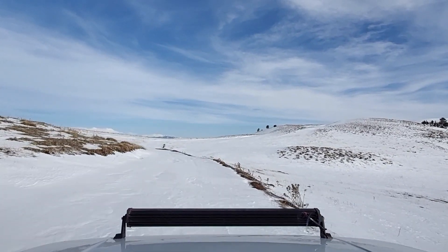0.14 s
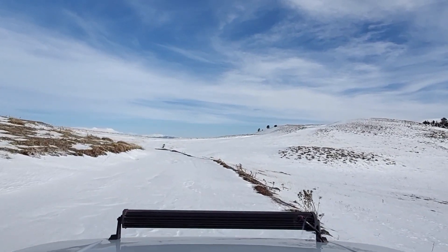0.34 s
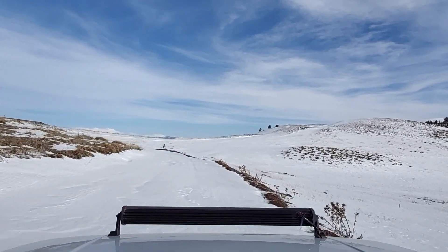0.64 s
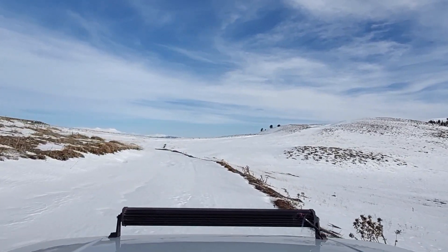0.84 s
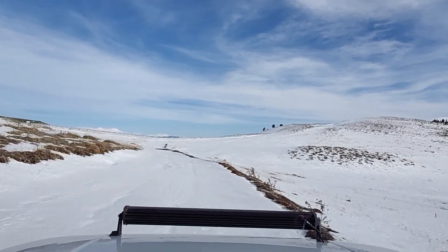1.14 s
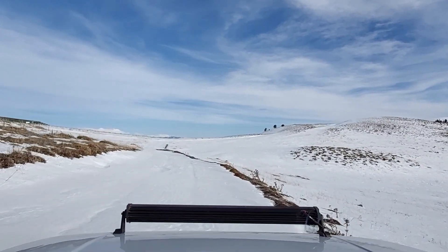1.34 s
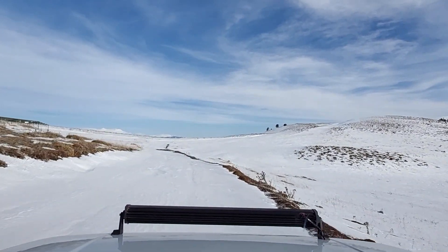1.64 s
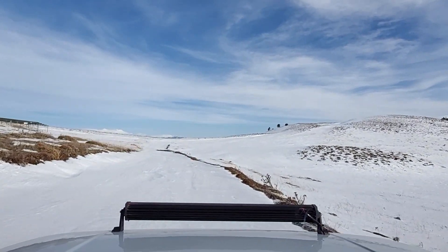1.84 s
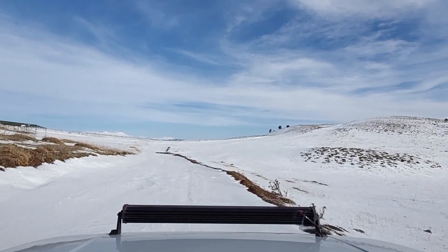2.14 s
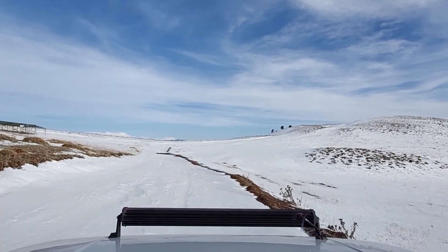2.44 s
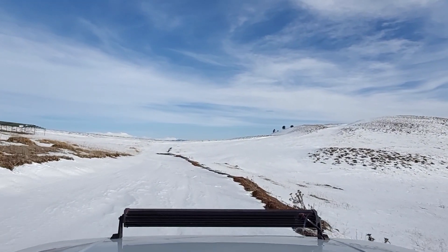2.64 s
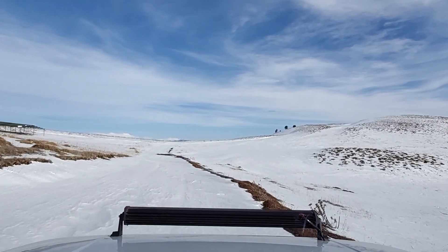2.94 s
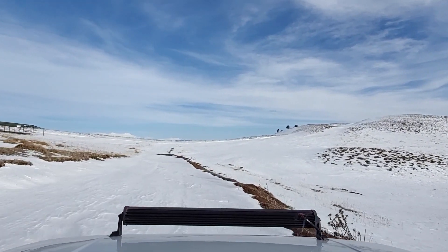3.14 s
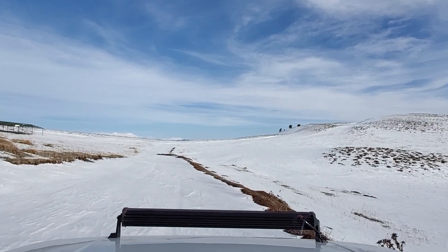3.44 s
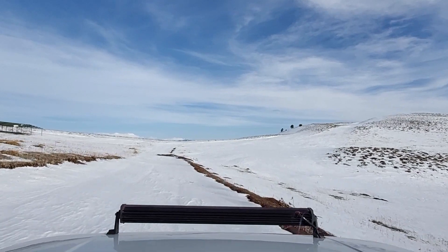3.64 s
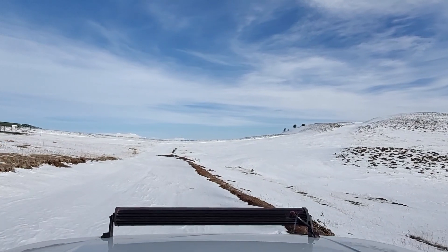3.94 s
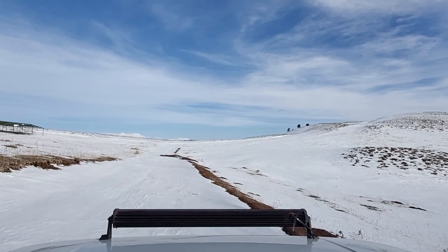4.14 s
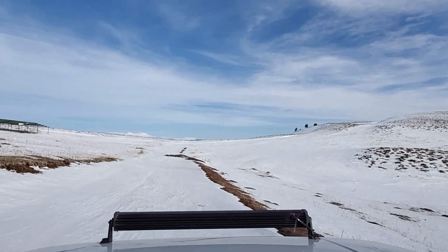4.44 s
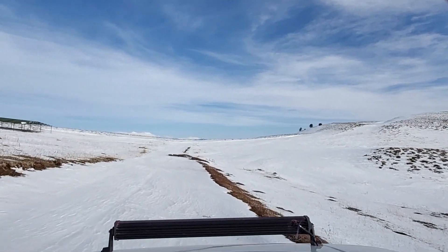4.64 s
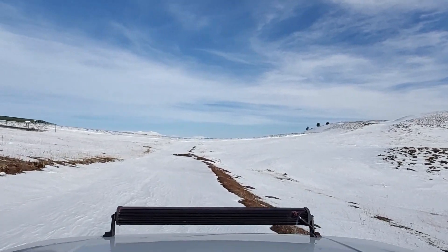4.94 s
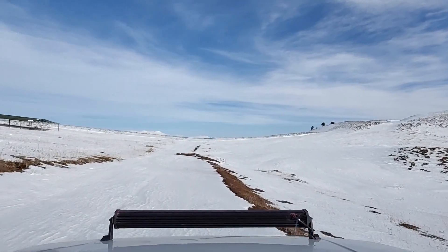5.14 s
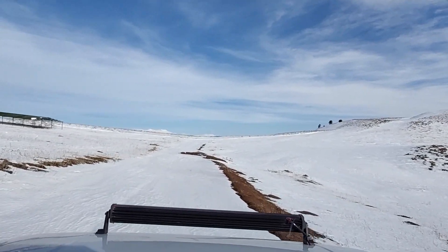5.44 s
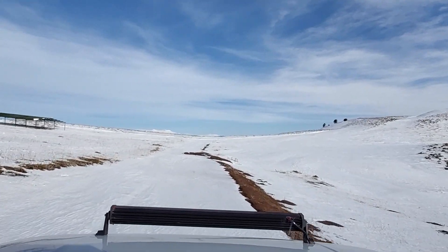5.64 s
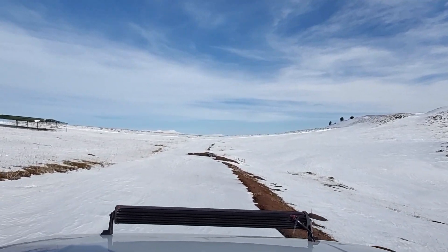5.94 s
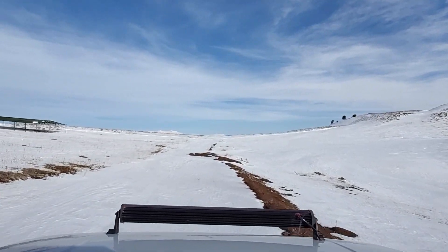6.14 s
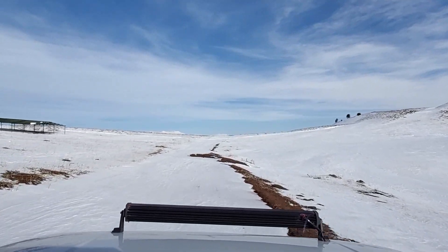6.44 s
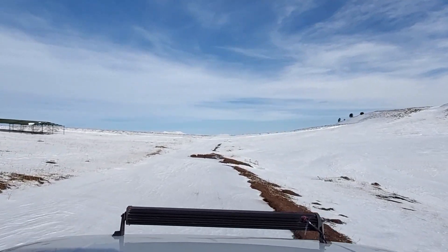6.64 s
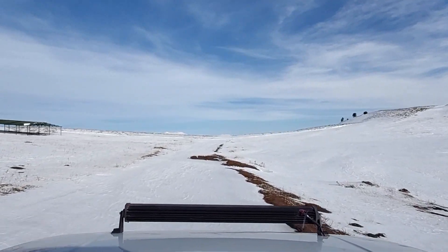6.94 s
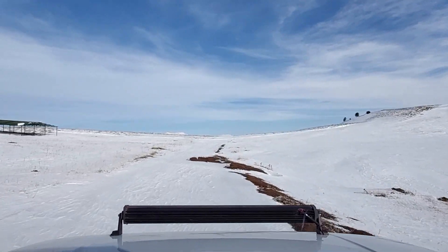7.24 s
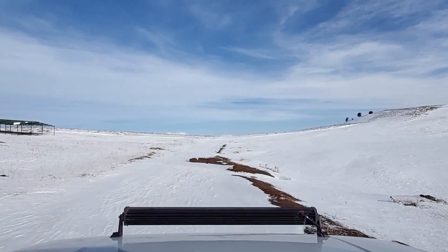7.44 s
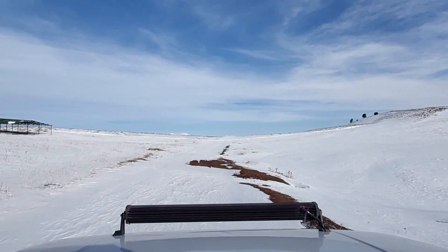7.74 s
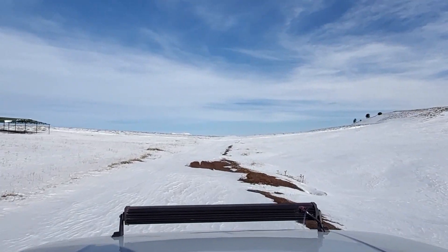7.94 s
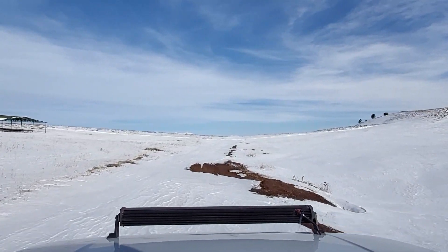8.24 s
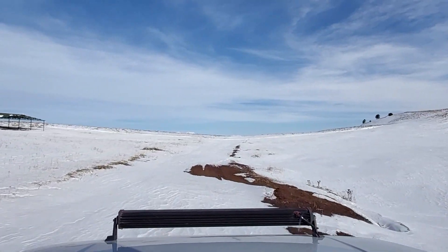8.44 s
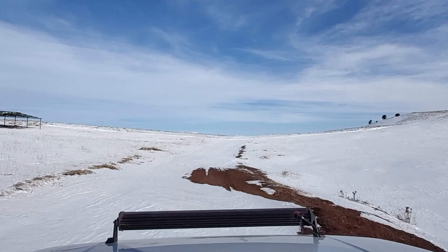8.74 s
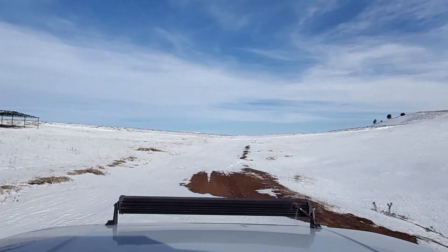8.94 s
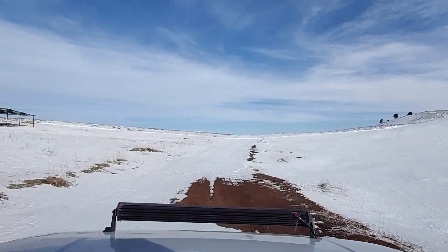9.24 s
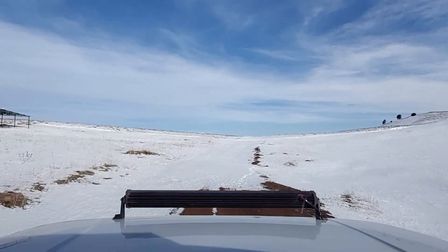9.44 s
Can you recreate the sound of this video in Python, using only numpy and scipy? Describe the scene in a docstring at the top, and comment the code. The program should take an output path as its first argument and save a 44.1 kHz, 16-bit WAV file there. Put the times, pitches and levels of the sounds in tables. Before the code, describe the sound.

An off-road car's engine booms at high revs inside the cabin, drops at an upshift, then pulls again with gear whine and ticking.

```python
"""A four-cylinder off-road car pulls over snow, heard from the cabin. First it revs high in a low gear:
the cabin booms at twice the firing rate, the engine clatters and small metal parts jingle, while the
tyres rumble through the body and hiss in the snow. From 4.3 s the car shifts up and the revs fall.
After about 5.2 s it pulls again: the higher gear whines, and a loose part ticks as the shaft turns."""
import sys
import numpy as np
from scipy.fft import rfft, irfft, next_fast_len
from scipy.io import wavfile
from scipy.ndimage import uniform_filter1d, map_coordinates

SR = 44100
rng = np.random.default_rng(int(sys.argv[2]) if len(sys.argv) > 2 else 0)


def unload_audio(sound):
    """Save the sound as a 16-bit wav file, at the path given as the first command line argument."""
    columns = np.transpose(np.atleast_2d(sound))
    # keep every value between -1 and 1, then stretch to whole-number steps
    steps = np.round(np.clip(columns, -1, 1) * 32767)
    wavfile.write(sys.argv[1], SR, steps.astype(np.int16))


N = 422478
TIME = np.arange(N) / SR
SHIFT_S = (4.3, 5.15)  # start and end of the gear shift
GEAR_RATIOS = (1.03, 1.838)  # drive shaft turns per engine cycle, before and after the shift


def amp(db):
    """Turn decibels into a gain."""
    return 10 ** (np.asarray(db) / 20)


def unit(x):
    """Scale to an average (rms) level of 1."""
    return x / np.sqrt(np.mean(x ** 2) + 1e-20)


def along(points, hz):
    """Look up a (frequency, value) table on a log frequency axis."""
    freqs, values = np.transpose(points)
    return np.interp(np.log(hz + 1), np.log(freqs + 1), values)


def curve(rows):
    """Join (time, value) points with straight lines."""
    return np.interp(TIME, *np.transpose(rows))


def swells(rows):
    """Add up bell-shaped rises and dips, in dB."""
    return sum(db * np.exp(-((TIME - s) / width) ** 2) for s, width, db in rows)


def wobble(rate):
    """A smooth curve through `rate` random points a second."""
    steps = np.arange(0, N, 64)
    points = rng.standard_normal(int(N * rate / SR) + 4)
    return np.interp(np.arange(N), steps, map_coordinates(points, [steps * rate / SR]))


def noise():
    """Two unrelated white noises."""
    return rng.standard_normal((2, N))


def filtered(x, response):
    """Give each frequency the gain response(hz); the ends are mirrored to avoid clicks."""
    size, margin = x.shape[-1], 4096
    padded = np.pad(x, [(0, 0), (margin, margin)], mode="reflect")
    length = next_fast_len(size + 2 * margin)
    spectrum = rfft(padded, length) * response(np.fft.rfftfreq(length, 1 / SR))
    return irfft(spectrum, length)[:, margin:margin + size]


# how alike the two ears hear the cabin: (frequency [Hz], likeness [0 to 1])
EAR_LIKENESS = [(100, 1), (250, 0.77), (400, 0.94), (600, 0), (1000, 0.41), (2000, 0.4), (4000, 0.026),
                (10000, 0)]

def spread(hz):
    """Stereo width as an angle: bass is alike in both ears, treble is not."""
    return np.arccos(np.clip(along(EAR_LIKENESS, hz), -1, 1)) / 2


def coloured(pair, colour):
    """Shape two noises into stereo sound of level 1; a colour says how strong each frequency is."""
    response = lambda hz: amp(along(colour, hz)) * [np.cos(spread(hz)), np.sin(spread(hz))]
    mid, side = filtered(pair, response)
    return unit(np.array([mid + side, mid - side]))


def tone(turns, hz, flutter_db, drift):
    """One wave per turn, wavering in level and phase (drift, in radians); hz sets the stereo width."""
    phase = 2 * np.pi * (turns % 1) + drift * wobble(9)
    apart = spread(hz) * rng.choice([-1, 1]) * np.array([[1], [-1]])
    return np.sqrt(2) * amp(flutter_db * wobble(14)) * np.sin((phase + apart).astype(np.float32))


# how hard the tyres crush the snow: (time [s], relative level [dB])
SNOW_CRUSH = [(0, -56.5), (1.3, -54.5), (3.1, -53), (4.25, -53), (4.45, -56.5), (4.8, -59.5), (5.4, -58.5),
              (5.9, -58.5), (6.5, -55), (7.5, -59), (8.1, -60.5), (9.58, -61)]
# rough ground under the tyres: (time [s], half width [s], extra rumble [dB])
GROUND_BUMPS = [(.6, 0.12, 3.5), (1.71, .06, 7), (2.15, .15, 4.5), (2.7, .3, 2), (3.09, .12, 7),
                (3.47, .12, 8.5), (5.17, 0.06, 3), (6.0, .13, 5.5), (6.52, 0.19, 7), (7.07, .1, 5)]
# colours of the tyre rumble, body drone and snow hiss: (frequency [Hz], level [dB])
RUMBLE_COLOUR = [(12, -39), (30, -19), (42, -10.5), (52, -6.5), (63, 0), (80, -9), (105, -6.5), (150, -5),
                 (200, -36), (400, -87)]
DRONE_COLOUR = [(100, -41.5), (160, 0), (200, -2.5), (240, 3), (290, -0.5), (350, 2.5), (410, 0),
                (460, -7.5), (510, -5.5), (580, -13.5), (800, -21), (1500, -68)]
HISS_COLOUR = [(1000, -28.5), (2700, 0.5), (3400, -3.5), (4300, 1.5), (4800, -4.5), (6000, -3.5),
               (7300, -8), (8400, -12.5), (11000, -13), (13000, -13.5), (15700, -17)]

def tyres():
    """Bumps shake the body; the harder the snow is crushed, the louder the hiss and the body's drone."""
    crush_db = curve(SNOW_CRUSH)
    rumble = amp(-32 + swells(GROUND_BUMPS)) * coloured(noise(), RUMBLE_COLOUR)
    drone = amp(crush_db + 23) * coloured(noise(), DRONE_COLOUR)
    grains = noise() * amp(1.2 * wobble(250) + 0.93 * wobble(25))
    hiss = amp(crush_db + 4) * coloured(grains, HISS_COLOUR)
    return rumble + drone + hiss


def shaft_knocks(shaft, start, end, db, scatter_db):
    """List (time, level) knocks: one at the start, then one after each turn of the shaft."""
    first, last = np.interp([start, end], TIME, shaft)
    times = np.interp(np.arange(first, last), shaft, TIME)
    return list(zip(times, db + scatter_db * rng.standard_normal(128)))


def strikes(rows, colour, ring_s, bounce_s):
    """Each hit is a sharp snap and a short ring, followed by a weaker bounce."""
    t = np.arange(SR // 8) / SR
    shape = amp(-60 * t / ring_s) + amp(1.5 - 60 * t / .008)  # ring + snap
    envelope = np.zeros(N + SR)
    for (s, db), flight in zip(rows, rng.uniform(0.34, 2, size=256)):
        bounce = s + bounce_s * flight
        envelope[round(s * SR):][:len(t)] += amp(db) * shape
        envelope[round(bounce * SR):][:len(t)] += amp(db - 8) * shape
    return envelope[:N] * coloured(noise(), colour)


# spells when a loose part knocks once per shaft turn: (start [s], end [s], relative level [dB])
RATTLE_SPELLS = [(4.589, 4.6, -45), (4.974, 5.12, -37.5), (5.549, 5.66, -34.5), (5.721, 5.82, -39),
                 (5.848, 5.99, -35.5), (6.01, 6.35, -37.5), (6.373, 6.5, -35.5), (6.523, 6.58, -33.5),
                 (6.601, 6.73, -35), (6.76, 7.3, -39.5), (7.323, 7.34, -35.5), (7.354, 7.54, -41),
                 (7.565, 7.68, -36), (7.695, 7.85, -39), (9.151, 9.17, -39), (9.465, 9.48, -43)]
# louder jingles of small metal parts, and a dull clunk in the shift: (time [s], relative level [dB])
LOUD_JINGLES = [(0.514, -44), (1.252, -46), (2.142, -47), (2.241, -44.5), (2.633, -45), (3.313, -42),
                (4.548, -46.5), (5.214, -42.5), (5.315, -47), (5.550, -44), (5.658, -47), (9.242, -51)]
SHIFT_CLUNK = [(4.69, -35.5)]
# colours of a tick, a jingle and the clunk: (frequency [Hz], level [dB])
TICK_COLOUR = [(800, -21.5), (1900, 6), (2550, 0.5), (3150, 2), (4300, -3), (5800, -2.5), (7300, -11),
               (9000, -20.5), (12000, -24), (16000, -23)]
JINGLE_COLOUR = [(2500, -43), (5000, 1), (8500, -6.5), (11200, -4.5), (13200, -1.5), (15700, -8.5)]
CLUNK_COLOUR = [(250, -24.5), (480, -2), (620, 0), (760, -12), (1500, -28), (4000, -50)]

def loose_parts(shaft):
    """Parts tick, jingle and clunk; in the low gear every shaft turn stirs a faint jingle."""
    knocks = [row for spell in RATTLE_SPELLS for row in shaft_knocks(shaft, *spell, scatter_db=1)]
    faint = shaft_knocks(shaft, 0, SHIFT_S[0], db=-54, scatter_db=4.5)
    ticks = strikes(knocks, TICK_COLOUR, ring_s=.035, bounce_s=.004)
    jingles = strikes(LOUD_JINGLES + faint, JINGLE_COLOUR, ring_s=.066, bounce_s=.006)
    clunk = strikes(SHIFT_CLUNK, CLUNK_COLOUR, ring_s=.08, bounce_s=.005)
    return amp(-7) * ticks + amp(-4.5) * jingles + clunk


# whine of the main gear pair and of the other pairs: (time [s], relative level [dB])
MAIN_WHINE = [(5.1, -80), (5.3, -47.5), (6.2, -53), (7.1, -49.5), (7.27, -39.5), (7.7, -45), (9.55, -47)]
OTHER_WHINE = [(5.1, -80), (5.8, -64), (7.1, -63), (7.7, -49), (9.58, -57)]

def gear_whine(shaft):
    """Gear teeth meet a whole number of times per shaft turn; slack makes their tones waver together."""
    turns = shaft + .009 * wobble(8)
    main = tone(28 * turns, 930, flutter_db=1.25, drift=.4)
    low = amp(1) * tone(23 * turns, 700, flutter_db=1, drift=.33)
    mid = amp(-7) * tone(35 * turns, 1100, flutter_db=1, drift=.4)
    high = amp(-6.5) * tone(41 * turns, 1300, flutter_db=1.5, drift=.8)
    return amp(curve(MAIN_WHINE)) * main + amp(curve(OTHER_WHINE)) * (low + mid + high)


def crank_pattern(cycle):
    """A rough pattern that repeats with each crank turn (two per engine cycle) and slowly changes."""
    patterns = irfft(np.exp(2j * np.pi * rng.random((4, 513))))
    place = (2 * cycle % 1) * patterns.shape[1]
    waves = np.array([np.interp(place, np.arange(len(p)), p) for p in patterns])
    blend = 1.2 * wobble(5)
    return unit(np.cos(blend) * waves[:2] + np.sin(blend) * waves[2:])


# where the body panels ring: (frequency [Hz], width [Hz], relative level [dB])
PANEL_RINGS = [(502, 48, 2.5), (713, 38, 2.5), (910, 90, -1), (1282, 24, 1), (1876, 210, -9),
               (2843, 28, -7.5)]

def panel_response(hz):
    """The body panels answer most strongly near their own ringing frequencies."""
    return sum((-1) ** k * amp(db) * 1j * hz * width / (centre ** 2 - hz ** 2 + 1j * hz * width)
               for k, (centre, width, db) in enumerate(PANEL_RINGS))


# clatter of the fuel burning in the cylinders: (time [s], relative level [dB])
CLATTER_LEVEL = [(0.1, -41.5), (1.17, -39.5), (4.18, -40), (4.73, -47), (6.04, -45.5), (6.51, -40),
                 (7.12, -43.5), (7.3, -43.5), (7.67, -46), (9.45, -47.5), (9.5, -46.5)]
# colours of the engine block's knock and of the roar: (frequency [Hz], level [dB])
BLOCK_COLOUR = [(250, -23), (520, 6), (720, -1.5), (930, 4.5), (1130, 0), (1500, 0.5), (2000, -1.5),
                (2700, -11.5), (3200, -14), (4300, -16.5), (5000, -28), (9000, -47)]
ROAR_COLOUR = [(900, -34), (1700, -7), (2400, 2.5), (2800, -2.5), (3050, -10), (4000, -16.5), (8000, -49)]

def clatter(cycle, firing_hz, pulse_depth=0.062, repeat_share=0.24):
    """Each firing knocks the engine block and rings the body panels; high revs add a brighter roar."""
    pulse = 1 + pulse_depth * np.cos(2 * np.pi * 4 * cycle)
    random_gain, repeat_gain = np.sqrt([1 - repeat_share, repeat_share])
    knocks = lambda: pulse * (random_gain * noise() + repeat_gain * crank_pattern(cycle))
    block = coloured(knocks(), BLOCK_COLOUR)
    ring = amp(-1.5) * unit(filtered(knocks() + 0.62 * crank_pattern(cycle), panel_response))
    roar = amp(-7) * (firing_hz / firing_hz.max()) ** 4 * coloured(knocks(), ROAR_COLOUR)
    return amp(curve(CLATTER_LEVEL)) * (block + ring + roar)


# low-gear tones one shaft rate away from the boom and its overtone: (frequency [Hz], level [dB])
THROB_LEVEL = [(138, -28), (150, -24.5), (178, -34), (193, -47), (310, -42), (336, -37), (352, -42),
               (366, -31.5)]

def shaft_throb(cycle, shaft):
    """The unbalanced shaft shakes the floor; in the low gear it makes the boom and its overtone pulse."""
    fade = np.interp(TIME, SHIFT_S, [1, 0]) ** 3
    out = amp(-42.5) * np.sin(2 * np.pi * shaft)
    for turns in (8 * cycle - shaft, 8 * cycle + shaft, 16 * cycle + shaft):
        hz = np.gradient(turns) * SR
        out = out + fade * amp(along(THROB_LEVEL, hz)) * tone(turns, hz[0], flutter_db=2, drift=.14)
    return out


# spells of rocking revs: (middle [s], half width [s], swing of the firing rate [Hz])
REV_SWINGS = [(5.47, .25, .8), (7.32, .55, 1.1)]

def rocking(swings_per_s=2.65):
    """The drive line winds up and unwinds, swinging the firing rate by this many Hz."""
    return sum(hz * np.exp(-((TIME - s) / width) ** 2) * np.cos(2 * np.pi * swings_per_s * (TIME - s))
               for s, width, hz in REV_SWINGS)


# how often the cylinders fire: (time [s], firing rate [Hz])
REVS = [(0, 78.42), (1.5, 78.95), (1.75, 77.3), (2, 79.16), (2.5, 79.9), (3.2, 81.52), (3.75, 85.03),
        (4.2, 86.3), (4.45, 75.48), (4.88, 63.56), (5.1, 48.9), (5.19, 45.9), (5.38, 51.34), (5.72, 52.35),
        (6.3, 57.26), (7, 62.18), (7.7, 67.33), (8.3, 68.75), (8.7, 69.8), (8.98, 72.55), (9.19, 68.6),
        (9.37, 71.8), (9.58, 72.33)]

def firing_rate():
    """Firings per second: they climb, fall in the shift and climb again."""
    return uniform_filter1d(curve(REVS), SR // 20) + rocking()


# the engine's tones: (waves per engine cycle [rounded when played],
# relative level revving high [dB], labouring at low revs [dB], pulling again [dB])
ENGINE_HARMONICS = [(4, -38.5, -31.5, -34), (10, -45, -32, -39), (12, -47.5, -40.5, -48),
                    (14, -40, -56, -53.5), (18, -37.5, -52, -56), (20, -36, -38.5, -38),
                    (22, -46, -47, -42.5), (24.4, -43, -37.5, -47.5), (26.39, -43.5, -48, -56),
                    (28, -62.5, -46.5, -46), (30, -52, -54, -56), (32, -50.5, -48.5, -58),
                    (36, -50, -61.5, -61.5), (44, -57.5, -63, -65.5), (46, -52, -59.5, -69.5),
                    (48, -55, -73.5, -72)]
# firing rates for those three levels: (revving high [Hz], labouring [Hz], pulling again [Hz])
HARMONIC_RATES = [80.4, 61, 66.3]
# how the throttle raises or lowers the tones: (time [s], level change [dB])
THROTTLE_LEVEL = [(0, -0.5), (1, 3), (3.3, 0.5), (4.2, -3.5), (5.1, -7), (5.6, -5), (6.35, 4), (8.2, -2),
                  (9.58, -1)]

def engine_tones(cycle, firing_hz):
    """Tones at multiples of the cycle rate; the revs set their balance, the throttle their level."""
    mean_cycle_hz = cycle[-1] * SR / N
    out = np.zeros((2, N))
    for multiple, *levels_db in ENGINE_HARMONICS:
        level_db = np.interp(firing_hz, *np.transpose(sorted(zip(HARMONIC_RATES, levels_db))))
        turns = np.round(multiple) * cycle + rng.random()
        out += amp(level_db) * tone(turns, multiple * mean_cycle_hz, 1.06, drift=.0098 * multiple)
    return amp(curve(THROTTLE_LEVEL)) * out


# how loudly the cabin answers at 2, 4 and 1.5 times the firing rate: (frequency [Hz], level [dB])
BOOM_LEVEL = [(94, -30.5), (104, -26.5), (114, -28), (119, -17), (124, -14), (133, -12), (144, -12),
              (156, -18.5), (161, -19), (167, -15.5), (172, -17.5)]
OVERTONE_LEVEL = [(190, -46.5), (225, -33), (245, -42), (268, -35), (288, -42), (316, -33.5), (335, -30.5),
                  (344, -22.5)]
GROWL_LEVEL = [(80, -40), (106, -35), (118, -27), (128, -21.5)]
# boom and overtone swell or sag as the load changes: (time [s], half width [s], level change [dB])
LOAD_SURGES = [(.1, 0.6, -4), (4.31, .06, 5), (4.61, .09, 3.5), (4.76, .06, -2), (6.88, 0.088, 2),
               (7.62, .06, 2)]

def cabin_boom(cycle, firing_hz):
    """Each strong engine tone swells as it passes a pitch at which the cabin rings."""
    surge_db = swells(LOAD_SURGES)
    boom_db = along(BOOM_LEVEL, 2 * firing_hz) + surge_db + 0.5 * rocking()  # 0.5 dB per Hz of swing
    overtone_db = along(OVERTONE_LEVEL, 4 * firing_hz) + surge_db
    growl_db = along(GROWL_LEVEL, 1.5 * firing_hz)
    boom = amp(boom_db) * tone(8 * cycle, 140, flutter_db=.25, drift=.03)
    overtone = amp(overtone_db) * tone(16 * cycle + rng.random(), 300, flutter_db=1.5, drift=.15)
    growl = amp(growl_db) * tone(6 * cycle + rng.random(), 120, flutter_db=1, drift=.1)
    return boom + overtone + growl


# balance between the ears: (frequency [Hz], left minus right [dB])
EAR_BALANCE = [(55, -7), (90, -2.5), (135, -4.5), (158, -2.5), (175, 6), (215, -2), (290, -7), (370, -9.5),
               (700, -4.5), (1290, -4.5), (2380, -4), (4400, -2), (8120, -6.5), (15000, -8.5)]

def ear_gains(hz):
    """Left and right gains: the right is louder except around 175 Hz."""
    left = 2 / (1 + amp(-along(EAR_BALANCE, hz)))
    return np.array([left, 2 - left])


def scene():
    """The turning engine and drive shaft, heard in the cabin over the noise of the tyres."""
    firing_hz = firing_rate()
    cycle_hz = firing_hz / 4  # four firings make one engine cycle
    cycle = np.cumsum(cycle_hz) / SR  # engine cycles so far
    shaft = np.cumsum(cycle_hz * np.interp(TIME, SHIFT_S, GEAR_RATIOS)) / SR  # shaft turns so far
    engine = cabin_boom(cycle, firing_hz) + shaft_throb(cycle, shaft)
    engine += engine_tones(cycle, firing_hz) + clatter(cycle, firing_hz)
    cabin = engine + gear_whine(shaft) + tyres() + loose_parts(shaft)
    return filtered(cabin, ear_gains)


def record(dry, top_hz=15750):
    """Cut off the very highest treble."""
    return filtered(dry, lambda hz: hz < top_hz)


dry = scene()
out = record(dry)
unload_audio(out)
```